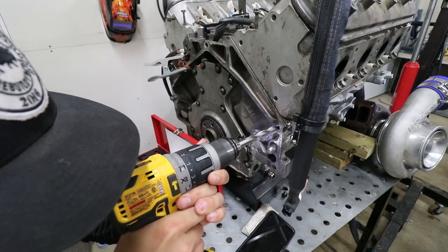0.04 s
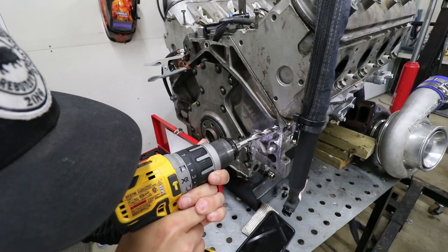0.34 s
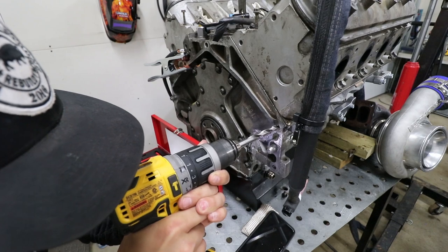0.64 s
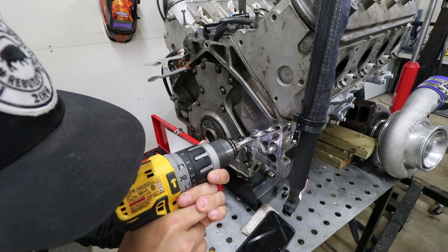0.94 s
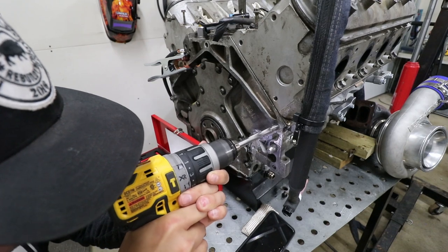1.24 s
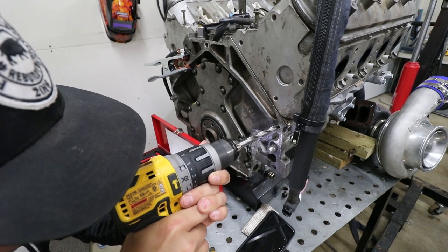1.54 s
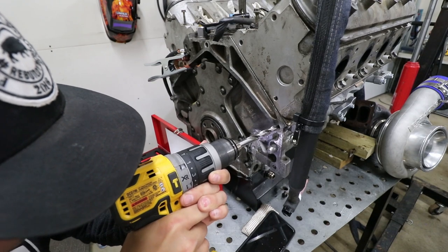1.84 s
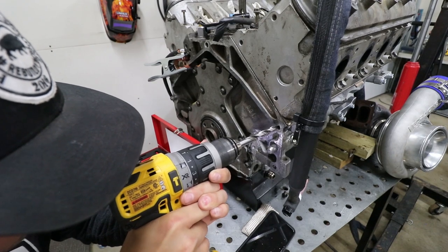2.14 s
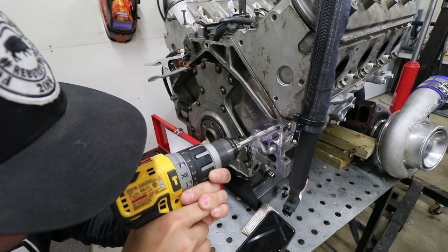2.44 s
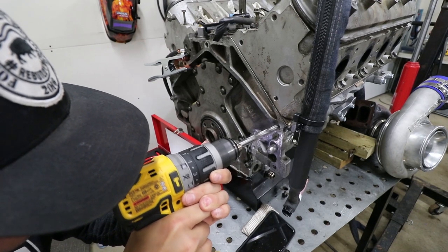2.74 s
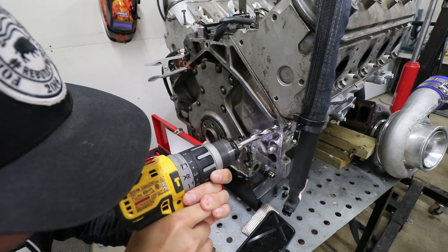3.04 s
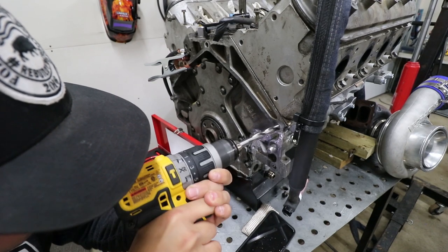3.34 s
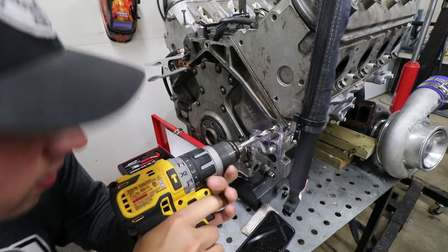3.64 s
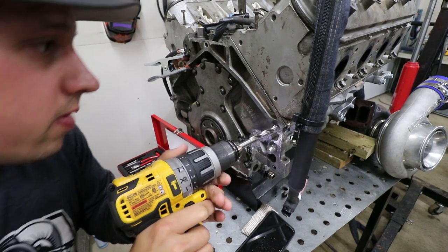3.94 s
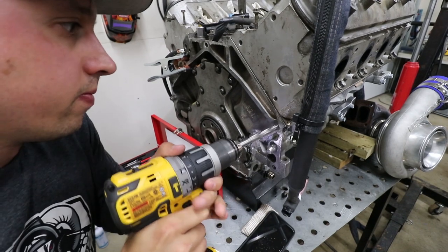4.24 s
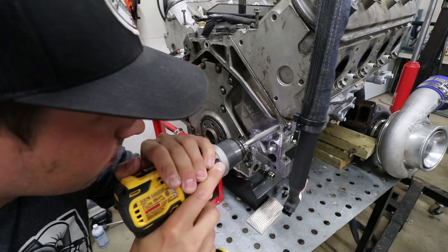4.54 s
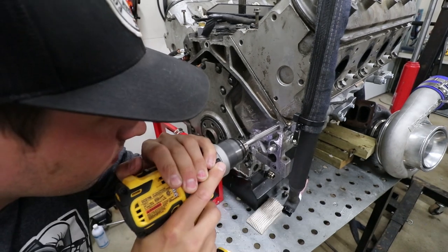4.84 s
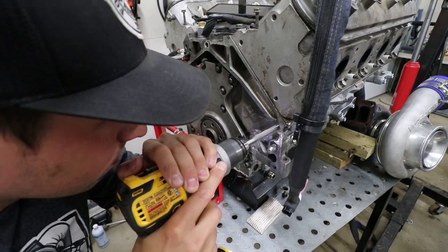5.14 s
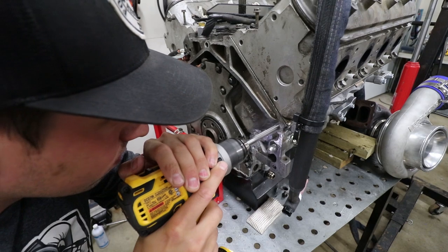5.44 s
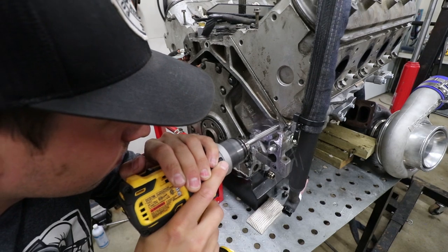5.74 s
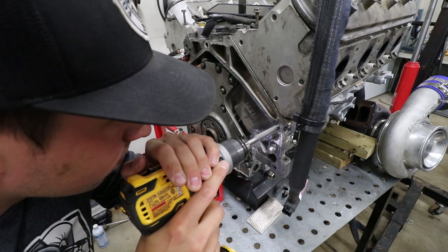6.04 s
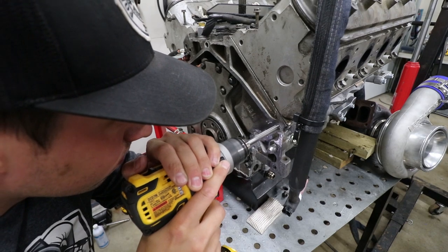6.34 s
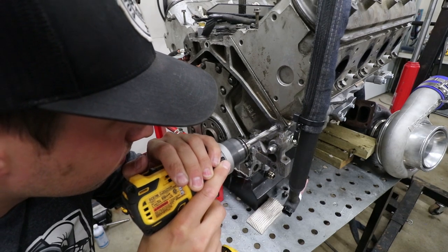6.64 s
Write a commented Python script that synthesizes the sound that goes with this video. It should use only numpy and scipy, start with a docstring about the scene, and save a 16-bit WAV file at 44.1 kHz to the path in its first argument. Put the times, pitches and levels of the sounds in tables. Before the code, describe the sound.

A cordless drill works on a bolt hole in an engine block, close and centred, in a quiet garage with light reverberation. A soft bump and a knock open it. From 0.1 to 3 seconds come eight short trigger pulls, roughly 0.4 seconds apart, each a rattling gear whine that rises and falls, sometimes dipping as the bit catches. Small knocks and dull bumps fall around the starts and stops. A ninth, longer pull at 3.2 seconds winds down by 3.6, followed by light clicks. Just before 4 seconds the mechanism gives two loud, sharp snaps in quick succession. A hard clack at 4.2 leads into one more brief, brighter burst. At about 4.5 seconds the drill is abruptly at full speed, a steady high motor whine over rushing fan air, holding until it brakes at about 6.6 seconds.

```python
"""A soft bump, a knock, then short bursts of gear whine: a cordless drill close to the microphone, opening up a
bolt hole in an engine block, in a garage. Nine pulls of the trigger wind the gearbox up and down; its teeth
whine and rattle in the housing, and the slack knocks at starts and stops. After two sharp snaps and one more
pull, the sound jumps straight to the drill running at full speed, with no spin-up heard, with motor tones and
rushing fan air, until it is braked. Drill and room both sit in the centre, the same in each channel."""
import sys
import numpy as np
from scipy import signal
from scipy.fft import rfft, irfft
from scipy.io import wavfile

SR = 44100
rng = np.random.default_rng(int(sys.argv[2]) if len(sys.argv) > 2 else 0)


def generate_wav(sig):
    """Save sig (samples, or channels by samples) to the path in sys.argv[1] as 16-bit PCM at SR."""
    pcm = np.round(np.clip(np.atleast_2d(sig).T, -1, 1) * 32767).astype(np.int16)
    wavfile.write(sys.argv[1], SR, pcm)


N = 294764
TIME = np.arange(N) / SR

# The drill bumping the work. Each row: start in seconds, peak in dB, centre pitch in Hz.
WORK_BUMPS = [(0.028, -32.5, 229), (0.245, -27.5, 650), (0.302, -31.5, 640), (0.947, -33, 523),
              (0.977, -29, 696), (1.023, -29.5, 1215), (2.141, -21.5, 547), (2.24, -33, 597),
              (3.553, -21, 896), (4.26, -34.5, 219.6)]
# Loose knocks of trigger, gears and chuck. Each row: start in seconds, peak in dB, treble in dB.
LOOSE_KNOCKS = [(0.053, -21, 0.0), (0.245, -26, -15), (0.434, -20.5, 6), (0.594, -26, -10), (0.815, -23, 3),
                (0.876, -14, -24), (0.905, -14.5, -20), (0.928, -16.5, -13), (0.947, -20, -2),
                (0.988, -25.5, 1), (1.023, -27, -6), (1.162, -24.5, -13), (1.177, -11.5, -24),
                (1.586, -25, 7), (2.134, -12.5, -17), (2.352, -21.5, -2), (3.189, -17, -11),
                (3.499, -19, -13), (3.526, -15.5, -22), (3.552, -18.5, -15), (3.612, -24, -3),
                (3.719, -29, -2), (3.752, -25, -3), (3.797, -30, -8), (3.836, -22.5, -2), (3.889, -26, 0),
                (4.231, -4.5, 6)]
# Pulls of the trigger. Each row: start and stop in seconds, top motor speed in turns a second,
# spin-up, run-down and attack in seconds, then level, treble and mesh tone in relative dB.
TRIGGER_PULLS = [(0.067, 0.204, 76.4, 0.0092, 0.053, 0.02, -17, -2.5, 3),
                 (0.455, 0.586, 77.3, 0.011, 0.038, 0.013, -17, -3.5, 2.5),
                 (0.825, 0.925, 26, 0.008, 0.04, 0.012, -23, -4.5, -0.5),
                 (1.194, 1.362, 115.6, 0.037, 0.057, 0.011, -17.5, -0.5, 0),
                 (1.614, 1.788, 102, 0.02, 0.047, 0.015, -17.3, -1, -0.5),
                 (1.966, 2.15, 82.5, 0.033, 0.057, 0.013, -16.5, -1, 1),
                 (2.379, 2.568, 115, 0.036, 0.052, 0.01, -17.5, 0, 1.5),
                 (2.797, 2.987, 93, 0.02, 0.046, 0.012, -16.5, -0.5, -1),
                 (3.207, 3.575, 96.6, 0.038, 0.29, 0.038, -15, 0, 4),
                 (4.246, 4.377, 108, 0.028, 0.069, 0.013, -21, 6, 0)]
# Broad colour of the gear noise. Each row: frequency in Hz, relative level in dB.
GEAR_SPECTRUM = [(59, -86), (100, -33.5), (214, -28.5), (319, -17.5), (697, -9), (1520, -6), (1690, -1.5),
                 (1960, -4.5), (3770, -4), (6120, -16.5), (8060, -15), (10200, -24.5), (15500, -27)]
# Resonances of the housing. Each row: centre in Hz, width in Hz, strength in dB.
HOUSING_MODES = [(583, 160, -0.5), (1330, 140, -1), (1672, 47, -2), (3065, 360, -0.5), (3930, 240, -13.5)]
# Overtones of the gear whine. Each row: multiple of the motor speed, relative level in dB.
GEAR_OVERTONES = [(23, -17.5), (29, -28.5), (32, -45), (46, -15.5), (69, -14.5), (92, -17.5)]
# The basic tooth-mesh tone. Its row: multiple of the motor speed, relative level in dB.
MESH_TONE = [(16, 0)]
# How well the housing radiates that tone. Each row: frequency in Hz, relative level in dB.
MESH_RADIATION = [(300, -10.5), (700, -4), (1250, -2.5), (1450, -2), (1700, 5.5), (2200, 2.5), (6000, -12)]
# The bit catching. Each row: centre time in seconds, share of speed lost, half-length in seconds.
BIT_CATCHES = [(0.145, 0.17, 0.02), (1.708, 0.14, 0.022), (2.503, 0.15, 0.016), (2.905, 0.083, 0.012),
               (3.347, 0.37, 0.029), (3.43, 0.19, 0.025), (4.692, 0.011, 0.015), (4.871, 0.0171, 0.01502),
               (5.32, 0.011, 0.015), (5.443, 0.013, 0.015), (5.56, 0.022, 0.012)]
# Hard snaps of the mechanism. Each row: start in seconds, peak in dB, main ring in Hz.
HARD_SNAPS = [(3.9495, 0.5, 1970), (3.9675, -2, 3800)]
# Broad colour of a snap. Each row: frequency in Hz, relative level in dB.
SNAP_SPECTRUM = [(120, -59), (200, -29.5), (641, -19), (1280, -15), (1450, -5), (3300, -5), (3820, -2),
                 (4750, -17), (7620, -20.5), (15500, -27.5)]
# Motor hum and gear whine at full speed. Each row: multiple of the motor speed, relative level in dB.
RUN_HUM = [(4, -30)]
RUN_WHINE = [(1, -47), (1.243, -53), (2, -39.5), (2.51, -47), (6.04, -48), (8, -36.5), (12.04, -48),
             (14.08, -49), (15.45, -43), (16.07, -36), (23, -34.5), (31, -52), (32.15, -52)]
# Rush of fan and gears. Each row: frequency in Hz, relative level in dB.
RUSH_SPECTRUM = [(100, -41), (200, -28), (400, -18.5), (650, -9.5), (1150, -10), (2000, -5.5), (3900, -3),
                 (4400, -6.5), (8500, -9), (9100, -11.5), (10900, -17), (11600, -11), (13800, -12.5),
                 (15800, -23)]
# Resonances of vents and casing. Each row: centre in Hz, width in Hz, strength in dB.
VENT_MODES = [(1390, 258, 0), (1734, 340, -2), (3250, 310, -8), (6520, 280, 2), (8050, 1300, -8),
              (12500, 1400, -23)]
# Room tone of the quiet garage. Each row: frequency in Hz, relative level in dB.
ROOM_TONE = [(20, 1.5), (40, -0.5), (120, -8), (300, 0.5), (1000, -3.5), (3000, -5.5), (8000, -15.5),
             (16000, -20)]
# The garage's reverberation. Each row: frequency in Hz, seconds to fall 60 dB, band gain in dB.
GARAGE_DECAY = [(150, 0.55, 0.5), (480, 0.63, -12.5), (1480, 0.78, -13), (3440, 0.77, -13),
                (7060, 0.54, -9), (14100, 0.31, -11.5)]


def from_db(db):
    """Decibels to gain."""
    return 10 ** (np.asarray(db) / 20)


def rms_one(x):
    """Scale to rms 1."""
    return x / np.sqrt(np.mean(x ** 2) + 1e-20)


def at_hz(points, hz, column=1):
    """Read one column of a table on a log-frequency axis."""
    points = np.array(points)
    return np.interp(np.log(np.maximum(hz, 1)), np.log(points[:, 0]), points[:, column])


def butter(x, hz, kind, order=2):
    """Causal Butterworth filter."""
    sections = signal.butter(order, np.clip(hz, 10, .48 * SR), kind, fs=SR, output="sos")
    return signal.sosfilt(sections, x)


def drift(rate):
    """A smooth random curve with spread 1 that changes about rate times a second."""
    pole = np.exp(-40 * np.pi * rate / SR)
    slow = signal.lfilter([1], [1, -2 * pole, pole * pole], rng.standard_normal(N // 20 + 2002))[2000:]
    return np.interp(np.arange(N) / 20, np.arange(len(slow)), rms_one(slow))


def body(spectrum, modes=(), size=4096):
    """Minimum-phase impulse response of unit energy: a broad colour with resonances on top."""
    hz = np.arange(size // 2 + 1) * SR / size
    gain = from_db(at_hz(spectrum, hz))
    for centre, width, db in modes:
        gain = gain * (1 + from_db(db) / (1 + (2 * (hz - centre) / width) ** 2))
    cepstrum = irfft(np.log(gain))[:size // 2]
    causal = 2 * cepstrum * (np.arange(size // 2) > 0)
    response = irfft(np.exp(rfft(causal, size)))
    return response / np.linalg.norm(response)


def through(x, response):
    """Pass a signal through an impulse response."""
    return signal.fftconvolve(x, response)[:N]


def room_tone(level_db=-50.5):
    """The quiet garage: faint, steady noise behind everything."""
    return from_db(level_db) * through(rng.standard_normal(N), body(ROOM_TONE))


def add(out, start_s, sound, peak_db):
    """Mix a sound in at a given peak level."""
    at = round(start_s * SR)
    out[at:at + len(sound)] += (from_db(peak_db) * sound / np.abs(sound).max())[:N - at]


def bumps(decay_s=0.0067, size=4096):
    """The drill rocks in the hand and bumps the work: short, dull thuds about an octave wide."""
    out = np.zeros(N)
    for start, db, hz in WORK_BUMPS:
        push = rng.standard_normal(size) * np.exp(-TIME[:size] / decay_s)
        add(out, start, butter(push, [hz / np.sqrt(2), hz * np.sqrt(2)], "band"), db)
    return out


def blow(chatter, decay_s, size=1024):
    """The force of one hard contact, followed by a few milliseconds of fine chatter."""
    force = chatter * rng.standard_normal(size) * np.exp(-TIME[:size] / decay_s)
    force[0] = 1
    return force


def knocks(treble_hz=3500, take_up_s=0.005, take_up_db=3.5, take_up_treble_db=-6):
    """Slack closes with a knock that rings the housing, just into every pull and at times between."""
    out, housing = np.zeros(N), body(GEAR_SPECTRUM, HOUSING_MODES)
    take_ups = [(start + take_up_s, db + take_up_db, treble_db + take_up_treble_db)
                for start, *_, db, treble_db, _ in TRIGGER_PULLS]
    for start, db, treble_db in LOOSE_KNOCKS + take_ups:
        force = blow(chatter=0.16, decay_s=0.0062)
        dull = butter(force, treble_hz, "low", order=1)
        knock = signal.fftconvolve(dull + from_db(treble_db) * (force - dull), housing)
        add(out, start, knock, db)
    return out


def bit_drag():
    """Share of the motor's speed lost to the bit catching."""
    return sum(share * np.exp(-((TIME - s) / half_s) ** 2) for s, share, half_s in BIT_CATCHES)


def trigger_pulls(surge_db=5.5, surge_s=0.052, ease_db_per_s=-9.5, brake_db=1.43, dull_db_per_s=-150):
    """Each pull spins the motor up and runs it down; returns speed, level, bite and mesh strength."""
    speed, level, bite, meshing = np.zeros((4, N))
    for start, stop, top, spin_up_s, run_down_s, attack_s, db, treble_db, mesh_db in TRIGGER_PULLS:
        on = (TIME >= start) & (TIME < stop)
        t = TIME[on] - start
        coasted_s = np.maximum(TIME[on] - (stop - run_down_s), 0)
        running = 1 - coasted_s / run_down_s
        speed[on] = top * (1 - np.exp(-t / spin_up_s)) * running
        # the gears are loudest while pulled up to speed, and quieten as the load eases
        load_db = surge_db * np.exp(-(t / surge_s) ** 2) + ease_db_per_s * t
        rattle_db = brake_db * np.sin(np.pi * running)  # teeth change flanks halfway down
        envelope = np.minimum(t / attack_s, 1) * np.minimum(running / 0.49, 1)
        level[on] = envelope * from_db(db + load_db + rattle_db)
        bite[on] = from_db(treble_db + dull_db_per_s * coasted_s)  # treble dies as the bit stops biting
        meshing[on] = from_db(mesh_db)
    lost = bit_drag()
    wander = 1 + 0.027 * drift(rate=14)  # the trigger finger is never quite steady
    meshing *= from_db(11 * lost)  # a catch brings out the mesh tone
    return speed * (1 - lost) * wander, level, bite, meshing


def tones(speed, orders, flutter, shake):
    """Tones locked to the shaft; each flutters in strength, and the shaft shakes by part of a turn."""
    turns = np.cumsum(speed) / SR + shake * drift(84)
    lines = (from_db(db) * (1 + flutter * drift(38)) * np.sin(2 * np.pi * (order * turns + rng.random()))
             for order, db in orders)
    return sum(lines) * np.sqrt(2 / (1 + flutter ** 2))


def impacts(per_s, spread_db):
    """Random tooth contacts of uneven strength, about rms 1."""
    sizes = from_db(spread_db * np.minimum(rng.exponential(1, N), 3.5)) * rng.choice([-1, 1], N)
    chance = np.maximum(per_s, 1) / SR
    return rms_one(sizes) * (rng.random(N) < chance) / np.sqrt(chance)


def gearbox(rattle_db=-7.0, rub_db=-6.5, mesh_db=-16.5, whine_db=-1.5, treble_hz=4800):
    """Teeth rattle, rub and whine in the housing; the faster they turn, the denser and brighter."""
    speed, level, bite, meshing = trigger_pulls()
    pace = speed / 75.2  # 1 at this many turns a second
    rattle = from_db(rattle_db) * impacts(per_s=400 + 8.0 * speed * pace, spread_db=2.5)
    turns = np.cumsum(speed) / SR
    rub = from_db(rub_db) * rng.standard_normal(N) * (1 + 0.1 * np.sin(2 * np.pi * turns))
    # the overtones only sing once the gears are up to speed
    whine = from_db(whine_db) * pace ** 2 * tones(speed, GEAR_OVERTONES, flutter=1.0, shake=0.0037)
    force = level * (rattle + rub + whine)
    dull = butter(force, treble_hz, "low", order=1)
    treble = (0.14 + 1.5 * pace) * bite * (force - dull)
    # the basic mesh tone carries at low speed too
    mesh_level = level * meshing * from_db(mesh_db) * np.minimum(2 * pace, 1)
    mesh = mesh_level * tones(speed, MESH_TONE, flutter=0.61, shake=0.0037)
    housing = body(GEAR_SPECTRUM, HOUSING_MODES)
    return through(dull + treble, housing) + through(mesh, body(MESH_RADIATION))


def snaps(ring_width_hz=450, ring_db=-3.0):
    """The mechanism snaps twice, loud and short, each time with its own main ring."""
    out = np.zeros(N)
    for start, db, hz in HARD_SNAPS:
        force = blow(chatter=0.98, decay_s=0.0029)
        ring = body(SNAP_SPECTRUM, [(hz, ring_width_hz, ring_db)])
        add(out, start, signal.fftconvolve(force, ring), db)
    return out


def long_run(start_s=4.542, brake_s=6.606, turns_per_s=413.2, rush_db=-20, hum_db=-2.5):
    """The motor holds near full speed until it is braked; returns speed, rush level and hum level."""
    t = np.maximum(TIME - start_s, 0)
    sag = 1.2 * t  # turns a second lost under load
    braking = 3400 * np.maximum(TIME - brake_s, 0)
    speed = np.maximum(turns_per_s - sag - braking, 0) * (1 - bit_drag()) * (1 + 0.0025 * drift(18.1))
    pace = (TIME >= start_s) * speed / turns_per_s
    deepening_db = 4 * t  # the hum grows as the bit goes deeper
    return speed, from_db(rush_db) * pace ** 2.2, from_db(hum_db + deepening_db) * pace ** 2.3


def motor_and_fan(whine_db=24.0, throb=0.27):
    """At full speed: motor hum and gear whine over a rush of fan and gears, pulsing four times a turn."""
    speed, rush_level, hum_level = long_run()
    pulsing = 1 + throb * np.sin(8 * np.pi * np.cumsum(speed) / SR)
    air = rng.standard_normal(N) * pulsing * from_db(0.82 * drift(110))
    rush = through(air, body(RUSH_SPECTRUM, VENT_MODES))
    hum = tones(speed, RUN_HUM, flutter=0.27, shake=0.015)
    whine = from_db(whine_db) * tones(speed, RUN_WHINE, flutter=0.14, shake=0.0024)
    return rush_level * (rush + whine) + hum_level * hum


def garage(x, build_s=0.014, bands=9):
    """Diffuse reflections build up at the microphone and die away, soonest in the high treble."""
    t, response = TIME[:SR], 0
    edges_hz = np.geomspace(80, 16000, bands + 1)
    for low, high in zip(edges_hz, edges_hz[1:]):
        hz = np.sqrt(low * high)
        fade = from_db(-60 * t / at_hz(GARAGE_DECAY, hz)) * (1 - np.exp(-t / build_s))
        band = butter(rng.standard_normal(SR), [low, high], "band")
        gain = from_db(at_hz(GARAGE_DECAY, hz, column=2))
        response = response + gain * band * fade / np.linalg.norm(fade)
    return through(x, response)


def scene():
    """The drill close to the microphone, dead centre, with the garage behind it."""
    drill = gearbox() + knocks() + snaps() + motor_and_fan() + bumps()
    return np.tile(drill + room_tone() + garage(drill), (2, 1))


def record(dry, cutoff_hz=16000):
    """A steep low-pass takes off the very top."""
    return signal.sosfilt(signal.ellip(10, .1, 80, cutoff_hz, fs=SR, output="sos"), dry)


dry = scene()
out = record(dry)
generate_wav(out)
```